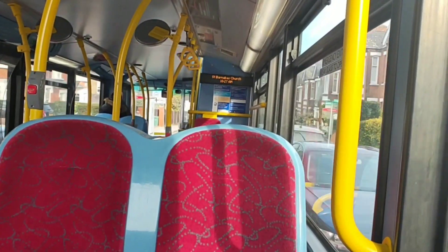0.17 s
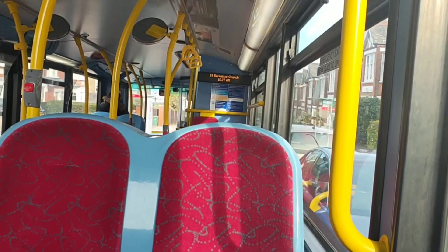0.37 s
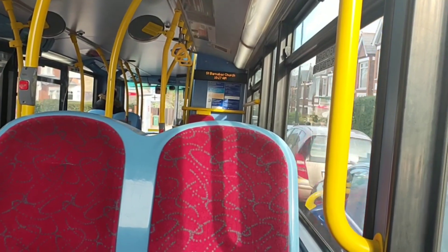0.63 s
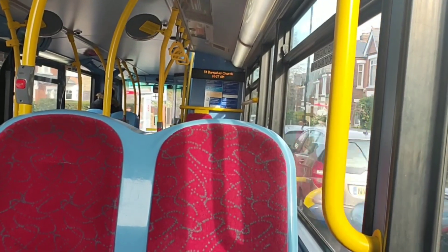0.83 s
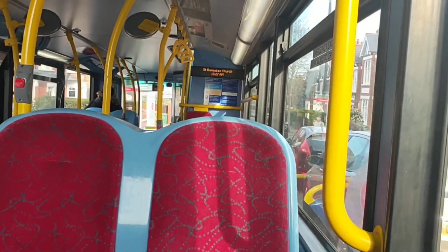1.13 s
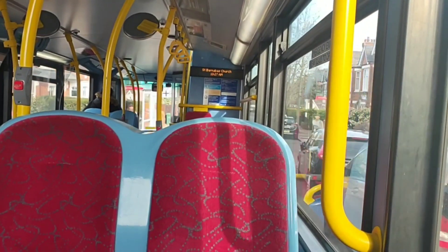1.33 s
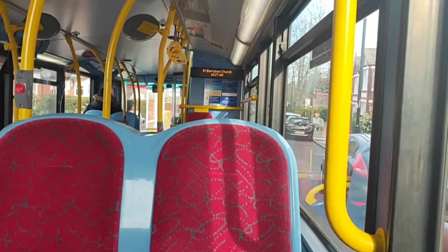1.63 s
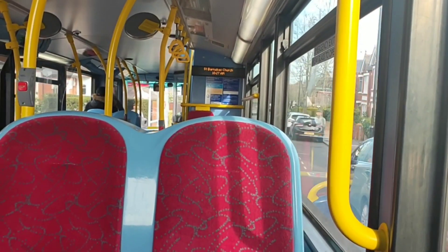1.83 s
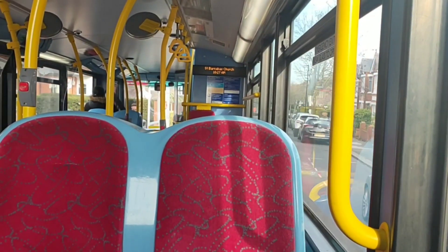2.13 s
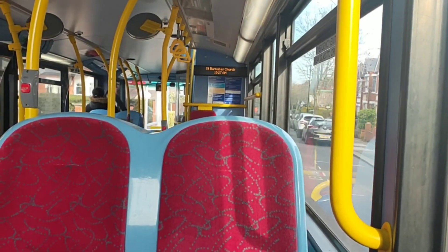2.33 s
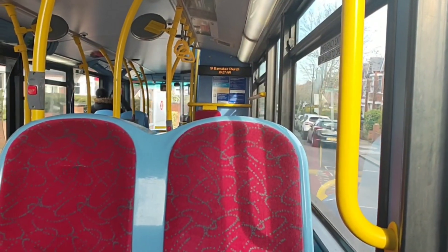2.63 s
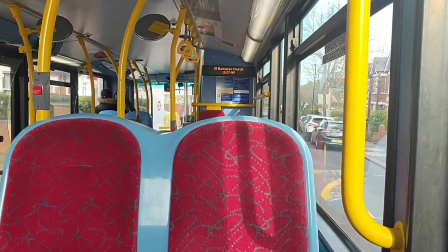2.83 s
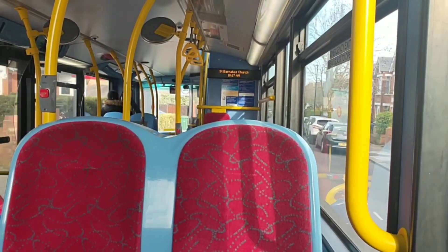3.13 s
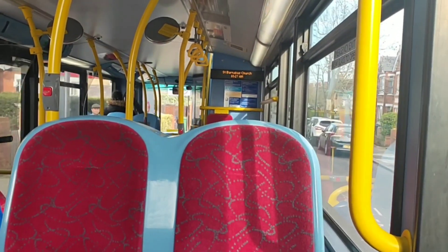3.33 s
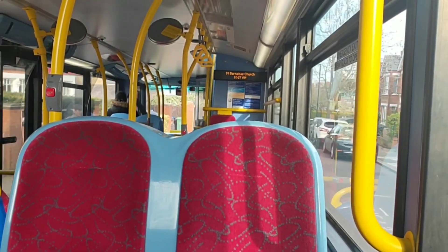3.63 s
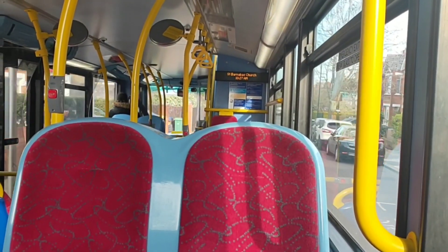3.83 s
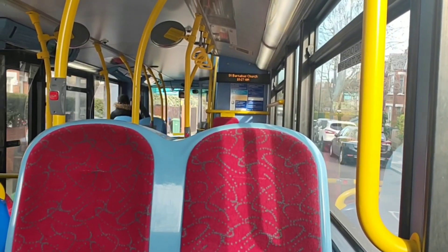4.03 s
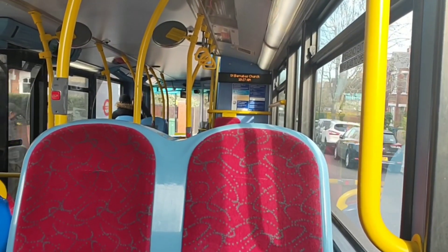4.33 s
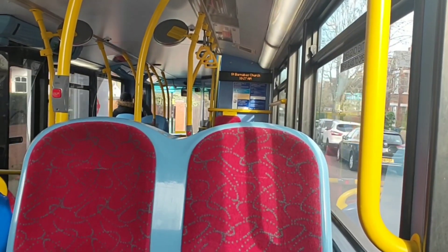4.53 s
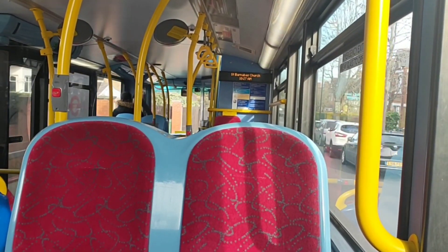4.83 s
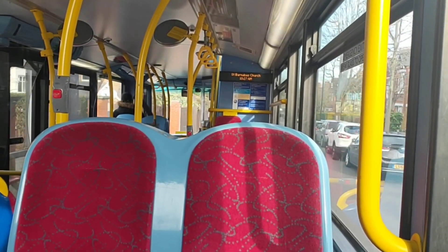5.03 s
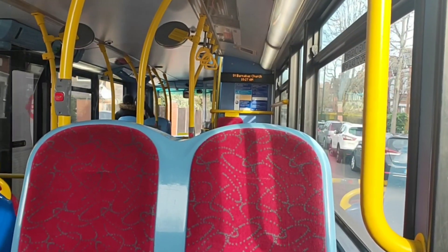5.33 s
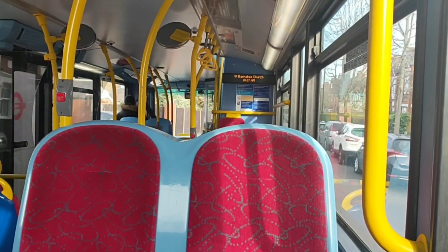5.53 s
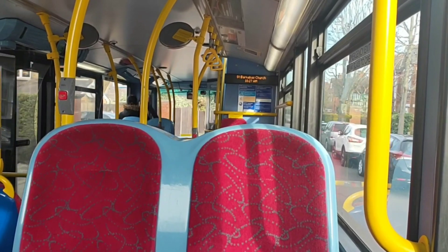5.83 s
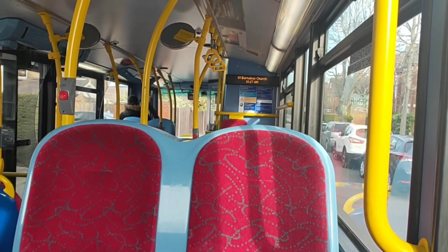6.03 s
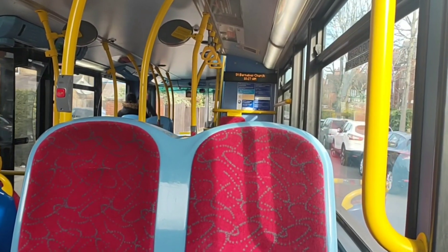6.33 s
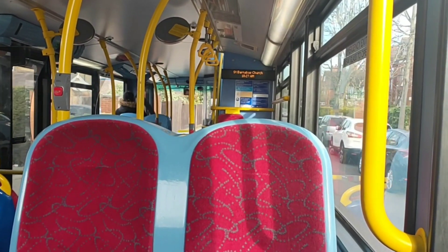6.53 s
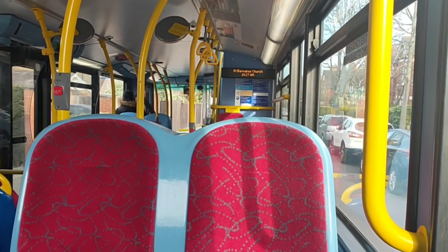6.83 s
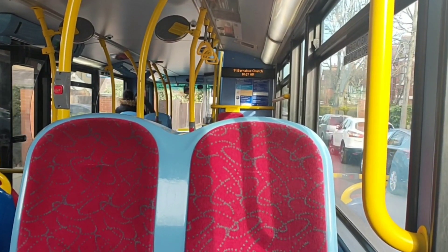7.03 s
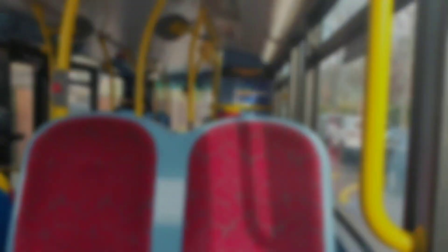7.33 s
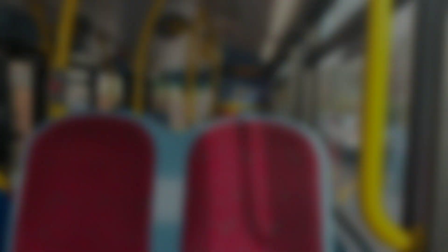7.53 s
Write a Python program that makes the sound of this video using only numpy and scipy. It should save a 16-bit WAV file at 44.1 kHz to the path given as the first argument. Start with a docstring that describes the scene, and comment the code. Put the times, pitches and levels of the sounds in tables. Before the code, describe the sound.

Inside a bus near the rear, in stereo, the sound is dominated by deep diesel rumble and low body shake, under duller road noise and faint hiss. From 0 to 1 s a loose strip taps and buzzes, light panels clatter on the left, thin high squeaks appear and a low shaft hum falls. Engine pitch steps down until about 3 s, with a gear whine sliding down from 0.4 to 2.2 s. Rattles bunch at 1.4 s and from 1.85 to 3.4 s, with duller knocks strongest near 2.7 s; the firing boom swells around 2.5 and 3.8 s. Another clatter comes at 4.3 s. Wavering brake squeaks sound from 3.7 to 5.4 s, then at 6.5 and 7.3 s. Small metal ticks come at 5.8 and 6.3 s, and a short panel scuff at 6.9 s. Finally the engine nears idle, road noise drops away, and light rattles end it.

```python
"""Inside a slowing bus, near the rear: at first a loose strip taps, thin high squeaks sound and a shaft hum falls.
A six-cylinder diesel, summed from crank orders, steps down toward idle; its firing boom swells and gears whine down.
Panels, struck resonant noise, rattle and knock on the left, most densely in the first half; road noise is
banded noise that throbs with the firing, and the body bounces at a low pitch. Later the brakes squeak as
wavering lines, small metal ticks, something scuffs a panel, and the road noise falls away."""
import sys
import numpy as np
from scipy import signal
from scipy.fft import rfft, irfft
from scipy.io import wavfile
from scipy.ndimage import uniform_filter1d

SR = 44100
rng = np.random.default_rng(int(sys.argv[2]) if len(sys.argv) > 2 else 0)


def generate_wav(signal):
    """Clip the signal to [-1, 1] and save it as 16-bit WAV at the path in sys.argv[1]."""
    frames = np.transpose(np.atleast_2d(signal))
    scaled = np.clip(frames, -1, 1) * 32767
    pcm = np.round(scaled).astype(np.int16)
    wavfile.write(sys.argv[1], SR, pcm)


def makeup_ratio(level_db):
    """Linear amplitude ratio for a level in decibels (20 dB per factor of ten)."""
    decades = np.asarray(level_db, float) / 20
    return 10 ** decades


N = 338688
T = np.arange(N) / SR
HZ = np.maximum(np.fft.rfftfreq(N, 1 / SR), 1)


def curves(table):
    """Columns of a table joined over time."""
    s, *columns = np.transpose(table)
    return [np.interp(T, s, c) for c in columns]


def at(table, hz):
    """Value of a (frequency [Hz], value) table on a log frequency axis."""
    f, v = np.transpose(table)
    return np.interp(np.log(hz), np.log(f), v)


def unit(x):
    """Scaled to rms 1."""
    return x / np.sqrt(np.mean(x ** 2))


def walk(rate_hz):
    """Random levels held 1 / rate_hz and slewed twice; spread about 1.7."""
    k = int(SR / rate_hz)
    held = np.repeat(rng.standard_normal(N // k + 1), k)
    return 2.31 * uniform_filter1d(uniform_filter1d(held, k), k)[:N]


def pan(lean_db):
    """Left and right gains as a column; lean_db is left minus right."""
    return makeup_ratio(np.array([lean_db / 2, -lean_db / 2]))[:, None]


def resonant(peaks, size=N):
    """Two unrelated noises through a set of resonances."""
    hz = np.fft.rfftfreq(size, 1 / SR)
    power = sum(makeup_ratio(2 * db) / (1 + ((hz - f) / (w / 2)) ** 2) ** 2 for f, w, db in peaks)
    return unit(irfft(rfft(rng.standard_normal((2, size))) * np.sqrt(power), size))


def struck(start_s, rise_s, t60_s, hold_s=0.):
    """Envelope that rises at start_s, holds and dies away."""
    t = T - start_s
    decay = np.exp(-np.log(1000) * np.maximum(t - rise_s - hold_s, 0) / t60_s)
    return np.clip(t / max(rise_s, 1e-4), 0, 1) * decay


def tone(table, waver, lean_db, rough_db, flutter_hz, fade_s):
    """Gain and phase of a thin line that wavers in pitch and level, fading in and out at its ends."""
    hz, db = curves(table)
    gate = np.clip(np.minimum(T - table[0][0], table[-1][0] - T) / fade_s, 0, 1)
    phase = 2 * np.pi * np.cumsum(hz * (1 + waver * walk(1200))) / SR
    gain = np.sqrt(2) * gate * makeup_ratio(db + rough_db * walk(flutter_hz)) * pan(lean_db)
    return gain, phase


# crank speed, stepping down through two gear changes toward idle: (time [s], crank rate [Hz])
CRANK_HZ = [(0, 19.9), (.5, 18.22), (.9, 16.6), (1.1, 16.4), (1.5, 16.51), (1.7, 16.2), (2.1, 14.6),
            (2.5, 12.96), (2.9, 11.82), (3.1, 11.58), (3.7, 11.67), (4.3, 11.47), (4.55, 11.24),
            (4.8, 10.75), (5.05, 10.84), (5.55, 10.81), (5.8, 10.47), (6.3, 10.26), (6.55, 10.24),
            (6.8, 10.53), (7.05, 10.55), (7.68, 10.93)]


def crank_angle():
    """Crank angle in radians, the running sum of the crank rate."""
    return 2 * np.pi * np.cumsum(curves(CRANK_HZ)[0]) / SR


# firing boom, crank order 3: (time [s], level [dB])
BOOM_DB = [(.1, -47), (.7, -39), (1.1, -27.5), (2.1, -22.5), (2.55, -13), (2.95, -20.5), (3.12, -18.5),
           (3.3, -20.5), (3.8, -14.5), (4.1, -18), (4.3, -22), (4.6, -35.5), (4.85, -25), (5.05, -54),
           (5.3, -29), (5.55, -29), (5.9, -20.5), (6.55, -22), (7.05, -29.5), (7.3, -45), (7.55, -30)]
# cabin drone, common to orders 4 and up: (time [s], level [dB])
DRONE_DB = [(.1, -27), (1.9, -30), (2.6, -33.5), (3.5, -33), (4.5, -33.5), (6.3, -36.5), (7.599, -45)]
# engine load, lift of orders 9 and 18 (other firing orders get 0.45 of it): (time [s], level [dB])
LOAD_DB = [(0, -5), (.6, 0), (2.0, -3), (2.899, 4), (3.55, -12.5), (4.0, 0.5), (4.599, -0.5), (5.1, 1),
           (5.7, 4), (6.1, 6), (6.55, 10.5), (6.751, 1.5)]
# crank orders 4, 5, 6 .. 45; firing, valve gear, pumps and belts each feed their own: (relative level [dB])
CRANK_ORDER_DB = [-24, -12, 6, -6, 0, 6.5, -2, -11, 6, -3, 1, 0, 5, -5, 3, -5, 4, -3, 0, -3, 4.5, -8, -5, 0,
                  -3, -4, 0, -4, 2, -5, 0, -6, 10, -9, 5, 2, -2, 1, -2, 0, -4, -4]
# how floor and cabin pass the orders: (frequency [Hz], gain [dB])
CABIN_GAIN_DB = [(20, -9), (38, 26), (60, -15), (95, -15.5), (130, -22), (153, -14.5), (167, -22),
                 (185, -13.5), (208, -23.5), (232, -4.5), (252, -13.5), (275, -26.5), (312, -16.5),
                 (350, -26), (400, -34.5), (460, -28.5), (520, -36), (620, -42), (720, -39)]
# stereo lean of engine and road noise: (frequency [Hz], left minus right [dB])
LEAN_DB = [(30, 5.5), (110, 3.5), (200, 7.5), (370, 5.5), (670, 1.5), (1220, 2.5), (2230, 4), (4080, 17),
           (7460, -9), (13600, 20)]


def engine(turn):
    """Crank orders as slightly wavering tones; each third is a firing order and follows the load."""
    boom_db, drone_db, load_db = (curves(table)[0] for table in (BOOM_DB, DRONE_DB, LOAD_DB))
    crank_hz = curves(CRANK_HZ)[0]
    slow = slice(0, N, 64)
    out = np.sqrt(2) * makeup_ratio(boom_db + .5 * walk(9.2)) * np.sin(3 * turn) * pan(4.7)
    for k, order_db in enumerate(CRANK_ORDER_DB, 4):
        hz = k * crank_hz[slow]
        load_share = (k % 3 == 0) * (1 if k in (9, 18) else .45)
        db = drone_db[slow] + load_share * load_db[slow] + order_db + at(CABIN_GAIN_DB, hz)
        level_waver = makeup_ratio((.5 + .03 * k) * walk(2.5))
        gain = np.sqrt(2) * np.interp(T, T[slow], makeup_ratio(db)) * level_waver
        side = pan(at(LEAN_DB, hz.mean()) + 0.45 * rng.standard_normal())
        # the left side lags, more so up the orders
        lag_rad = np.array([[0.013 * k + 0.012 * k * rng.standard_normal()], [0]])
        phase = k * turn + 2 * np.pi * rng.random() + 0.06 * walk(3.7) - lag_rad
        out += gain * side * np.sin(phase)
    return out


# light panels: (time [s], relative level [dB], bright edge re panel [dB], strongest ring [Hz], t60 [s])
RATTLE_HITS = [(0.024, -43, -8, 4930, 0.08), (0.0586, -42, -16, 3300, 0.2),
               (0.1144, -38.5, -25, 2580, 0.14), (.164, -46, -12, 4500, .06), (0.2654, -42, -22, 2600, .25),
               (0.689, -40, -19.5, 3570, 0.4), (0.7439, -40, -16.5, 4900, 0.61), (.785, -45, -15, 4900, .5),
               (0.8229, -40.5, -17, 3700, 0.5), (1.4016, -45, -5, 2780, 0.67),
               (1.4706, -48, -9, 2390, 0.63), (1.8521, -35, -10.5, 3410, 0.34),
               (1.921, -39.5, -13, 3300, 0.37), (2.0687, -42, -10.5, 3200, 0.23),
               (2.138, -43, -16, 3170, 0.27), (2.207, -48, -18, 3300, .25), (2.292, -42, -17, 3230, 0.23),
               (2.3634, -45, -19.5, 3300, 0.3), (2.443, -48, -20, 3300, .3),
               (2.519, -48.5, -24, 3370, 0.32), (2.6714, -47, -8.5, 3100, 0.4), (2.706, -49, -6, 2400, 0.4),
               (2.8683, -38, -12.5, 3230, 0.17), (2.9405, -43, -3, 2200, 0.17),
               (2.981, -47.5, -1, 3180, 0.43), (3.0835, -39, -10, 3200, .08),
               (3.1486, -49, -14.5, 2350, 0.5), (3.3719, -50.5, -5.5, 3180, 0.58),
               (4.3005, -36.5, -11.5, 2830, 0.12), (4.395, -40, -10, 3100, 0.18),
               (7.58, -47, -16, 3300, 0.3), (7.645, -51, -23, 3410, .3)]
# light panel resonances: (frequency [Hz], width [Hz], level [dB])
PANEL_RINGS = [(2170, 2900, 3.5), (3400, 1020, 5.5), (4690, 1900, 1.5)]
# bright edge resonances: (frequency [Hz], width [Hz], level [dB])
EDGE_RINGS = [(6800, 2800, 5.5), (11900, 3500, -10)]


def rattles():
    """Jolted light panels: a broad clatter with its own strongest ring and a bright edge, both decaying."""
    size = 16384
    out = np.zeros((2, N + size))
    t = T[:size]
    for s, db, edge_db, ring_hz, t60_s in RATTLE_HITS:
        rise = np.minimum(t / (.0005 + .02 * t60_s ** 2), 1)
        ring = 0.55 * np.exp(-np.log(1000) * t / max(t60_s, .02))
        snap = 0.27 * np.exp(-t / 0.005)
        panel = resonant(PANEL_RINGS + [(ring_hz, 450, 7.0)], size) * pan(10.3)
        edge = resonant(EDGE_RINGS, size) * pan(2.7)
        start = int(s * SR)
        out[:, start:start + size] += makeup_ratio(db) * rise * (ring + snap) * (panel + makeup_ratio(edge_db) * edge)
    return makeup_ratio(0.85 * walk(600)) * out[:, :N]


# heavier panels: (time [s], peak level [dB], strongest ring [Hz])
KNOCK_HITS = [(.0584, -48, 744), (1.4018, -51.5, 1220), (1.4675, -49.5, 1260), (1.8513, -61, 1290),
              (2.292, -54, 990), (2.514, -47.5, 990), (2.564, -44.5, 990), (2.659, -41, 1230),
              (2.68, -39.5, 725), (2.725, -46, 1370), (2.775, -57, 736), (2.8698, -52, 1410),
              (2.979, -54, 1006), (3.121, -49, 1280), (3.15, -47, 1240), (4.08, -49.5, 970)]
# heavier panel resonances: (frequency [Hz], width [Hz], level [dB])
KNOCK_RINGS = [(716, 70, -2), (1050, 140, -1), (1220, 170, 0), (1420, 200, -5)]


def knocks():
    """Heavier panels knock duller: one decaying blow, each with its own strongest ring."""
    size = 16384
    out = np.zeros((2, N + size))
    blow = struck(0, rise_s=0.0055, t60_s=0.39)[:size] * pan(11.0)
    for s, db, ring_hz in KNOCK_HITS:
        start = int(s * SR)
        out[:, start:start + size] += makeup_ratio(db) * blow * resonant(KNOCK_RINGS + [(ring_hz, 110, 3.0)], size)
    return makeup_ratio(0.85 * walk(600)) * out[:, :N]


# loose strip taps: (time [s], relative level [dB])
STRIP_TAPS = [(0.0887, -45), (0.2678, -42), (0.3317, -48), (0.4764, -43), (0.6071, -46), (0.6699, -42),
              (0.738, -39), (0.8316, -42), (0.97, -45), (1.0605, -48)]
# strip resonances: (frequency [Hz], width [Hz], level [dB])
STRIP_RINGS = [(1072, 180, 6), (1200, 100, -7)]


def trim():
    """A loose strip taps and buzzes early on: struck resonant noise with a fast random level."""
    taps = sum(makeup_ratio(db) * struck(s, rise_s=0.01, t60_s=0.34) for s, db in STRIP_TAPS)
    return makeup_ratio(-3.0 + 1.4 * walk(200)) * taps * resonant(STRIP_RINGS) * pan(3.9)


# scuffed panel resonances: (frequency [Hz], width [Hz], level [dB])
SCUFF_RINGS = [(940, 990, -2.5), (2180, 490, -0.5), (2980, 610, -6), (6360, 1760, -6.5), (7200, 500, -9.5),
               (11500, 5000, -24.5)]


def scuff():
    """Something slides against a panel late on: resonant noise that rises, holds and dies away."""
    slide = struck(6.878, rise_s=0.0093, t60_s=0.63, hold_s=0.033)
    return makeup_ratio(-46.5) * slide * resonant(SCUFF_RINGS) * pan(7.0)


# brake squeaks: (start [s], length [s], first pitch [Hz], last pitch [Hz], peak level [dB])
BRAKE_SQUEAKS = [(0, 0.22, 10150, 10190, -68), (.22, .31, 7900, 7960, -64), (4.61, .14, 5120, 5060, -71),
                 (1.85, 0.28, 6830, 6590, -64), (3.69, 0.13, 7400, 7600, -62.5),
                 (3.957, 0.34, 6600, 6850, -62.5), (4.23, 0.37, 6250, 6170, -60),
                 (4.537, .16, 6690, 6650, -62.5), (5.16, 0.26, 6540, 6860, -61.5),
                 (6.52, .07, 6350, 6340, -64), (6.57, 0.33, 6350, 6300, -61), (7.33, 0.27, 6365, 6368, -62)]
# squeak level at both ends: (pitch [Hz], level re peak [dB])
SQUEAK_END_DB = [(6370, -20.5), (6600, -10.5), (7500, -26)]
# full-level span of a squeak: (from [share of length], to [share of length])
SQUEAK_FULL_SPAN = (.25, .7)
# faint line between the last two squeaks: (time [s], pitch [Hz], level [dB])
PAD_DRAG_LINE = [(6.8, 6313, -69), (7.05, 6312, -70), (7.2, 6330, -76), (7.38, 6360, -71)]
# fast pitch waver: (pitch [Hz], waver [share of pitch])
HOARSE_WAVER = [(5100, .002), (6370, .0015), (6650, .007), (7500, .008), (7900, .008), (10150, .012)]
# stereo lean of squeaks: (pitch [Hz], left minus right [dB])
SQUEAK_LEAN_DB = [(6220, -2.5), (6700, -6), (7900, -6), (10150, -3)]


def squeak_line(start_s, length_s, first_hz, last_hz, peak_db):
    """One pad slip as (time [s], pitch [Hz], level [dB]): a pitch glide that swells and fades."""
    end_db = at(SQUEAK_END_DB, first_hz)
    full, fade = SQUEAK_FULL_SPAN
    points = ((0, end_db), (full, 0), (fade, 0), (1, end_db))
    return [(start_s + share * length_s, first_hz + share * (last_hz - first_hz), peak_db + db)
            for share, db in points]


def brakes():
    """Pads slip on the discs as wavering lines; mid-pitched ones carry a faint partial a fifth above."""
    out = np.zeros((2, N))
    for table in [squeak_line(*row) for row in BRAKE_SQUEAKS] + [PAD_DRAG_LINE]:
        hz = table[1][1]
        waver = at(HOARSE_WAVER, hz)
        gain, phase = tone(table, waver, at(SQUEAK_LEAN_DB, hz), rough_db=1.2 + 150 * waver,
                           flutter_hz=110, fade_s=0.015)
        fifth = makeup_ratio(-17) * (6500 < hz < 7000)
        out += gain * (np.sin(phase) + fifth * np.sin(phase * 3 / 2 + .6 * walk(400)))
    return out


# falling shaft hum, falling gear whine, two short thin rings; each: (time [s], pitch [Hz], level [dB])
HUM_WHINE_RING_LINES = [
    [(0, 40.6, -25), (.42, 38.4, -26.5), (.55, 36.4, -26.5), (.75, 36.9, -27), (.95, 36.3, -36)],
    [(.4, 572, -58), (.65, 530, -50), (1.0, 482, -56), (1.25, 445, -49), (1.55, 400, -59), (1.85, 372, -46),
     (2.2, 340, -58)],
    [(.9, 3310, -72), (1.14, 3300, -69), (1.24, 3300, -74)],
    [(6.2, 1000, -61), (6.33, 995, -56), (6.48, 990, -64)],
]


def gears():
    """Shaft and tooth-mesh tones of the driveline, and two short thin rings, as slightly wavering sines."""
    out = np.zeros((2, N))
    for table in HUM_WHINE_RING_LINES:
        gain, phase = tone(table, waver=.004, lean_db=4.5, rough_db=1.7, flutter_hz=45, fade_s=.06)
        out += gain * np.sin(phase)
    return out


# small metal part: (time [s], relative level [dB])
TICK_HITS = [(5.8222, -58), (6.2402, -55.5), (6.3347, -49), (6.3694, -49)]


def ticks():
    """A small metal part ticks: short bursts of noise through one bright resonance."""
    hits = sum(makeup_ratio(db - 2) * struck(s, rise_s=.001, t60_s=0.06) for s, db in TICK_HITS)
    return hits * resonant([(5950, 700, 0)])


# body shake: (time [s], level [dB])
BOUNCE_DB = [(0.05, -10), (0.2, -20), (1.22, -20.5), (1.34, -37), (1.64, -13.5), (2.9, -47.5), (3.26, -14),
             (3.49, -33), (3.58, -20.5), (3.72, -34), (3.98, -26), (4.94, -42), (5.92, -33), (7.23, -50),
             (7.59, -29), (7.68, -48)]


def bounce():
    """The body shakes on its tyres and springs: a low sine of wavering pitch."""
    hz = 13.9 * (1 + 0.016 * walk(12))
    shake = np.sin(2 * np.pi * np.cumsum(hz) / SR)
    return np.sqrt(2) * makeup_ratio(curves(BOUNCE_DB)[0]) * shake * pan(4.6)


# noise bands above the rumble:
# (time [s], tyre roar level [dB], panel buzz level [dB], diesel clatter level [dB], treble hiss level [dB])
RIDE_DB = [(0.1, -52.5, -51, -52.5, -57), (0.52, -51, -51, -57, -60.5), (1.75, -51.5, -54, -59, -59.5),
           (2.8, -51, -54.5, -55, -62), (3.48, -52, -57, -60.5, -62), (4.64, -55, -56, -59.5, -60),
           (4.74, -52, -54, -56.5, -60.5), (5.1, -52.5, -53, -54, -60.5), (5.55, -52.5, -56, -60.5, -64),
           (5.88, -52, -57, -55.5, -63), (5.96, -52, -52.5, -53, -56.5), (6.64, -54, -54, -55, -57),
           (6.8, -56.5, -58.5, -59, -57.5), (7.68, -65, -65, -66.5, -69.5)]
# edges between rumble, roar, buzz, clatter and hiss: (frequency [Hz])
BAND_EDGES_HZ = [430, 900, 1800, 3500]
# noise spectrum: (frequency [Hz], relative level [dB])
RIDE_COLOUR_DB = [(9, -9.5), (17, -14), (25, -0.5), (45, -18), (90, -15.5), (150, -27.5), (240, -27.5),
                  (350, -35.5), (500, -37.5), (830, -43), (1190, -42), (1990, -51), (2520, -52.5),
                  (4340, -63.5), (6240, -61.5), (7900, -71), (13100, -85), (14200, -90)]
# left-right likeness: (frequency [Hz], likeness [0-1])
STEREO_LIKENESS = [(60, 1), (130, 1), (280, 0.95), (610, 0.28), (1330, 0.06), (2890, 0), (6280, 0),
                   (13600, 0)]
# panels that ring all the time: (frequency [Hz], width [Hz], lift [dB])
BODY_RING_LIFTS = [(1030, 15, 2), (1610, 33, 6.5), (3340, 370, 3), (4930, 740, 5.5), (7100, 800, 4.5)]


def ride(turn):
    """Road and engine noise through the body; the top throbs with firing and valve gear under load."""
    drone_db, load_db = curves(DRONE_DB)[0], curves(LOAD_DB)[0]
    a, b = rfft(rng.standard_normal((2, N)))
    like = np.where(HZ < 50, 1, np.clip(at(STEREO_LIKENESS, HZ), 0, 1))
    both = np.array([a, like * a + np.sqrt(1 - like ** 2) * b])
    both = both * makeup_ratio(at(RIDE_COLOUR_DB, HZ)) * pan(at(LEAN_DB, HZ))[:, 0]
    both = both * makeup_ratio(sum(db / (1 + ((HZ - f) / (w / 2)) ** 2) for f, w, db in BODY_RING_LIFTS))

    # half-octave bands, each with its own slow random level
    groups = np.zeros((len(BAND_EDGES_HZ) + 1, 2, N))
    for hz in 9 * 2 ** np.arange(0, 10.6, .5):
        share = np.clip(1 - np.abs(2 * np.log2(HZ / hz)), 0, 1)
        groups[np.searchsorted(BAND_EDGES_HZ, hz)] += irfft(both * share, N) * makeup_ratio(1.1 * walk(7))

    # three firings a turn, each of its own size; the valve gear chatters four times as fast
    pulsing = np.clip(0.058 + 0.022 * load_db, 0, .9)
    firing = 3 * turn / (2 * np.pi)
    size = makeup_ratio(4.0 * rng.standard_normal(int(firing[-1]) + 1))[firing.astype(int)]
    burst = 2.5 * size * np.exp(-(firing % 1) / .3)
    chatter = .45 * np.cos(4 * 2 * np.pi * firing)
    throb = 1 + pulsing * (burst + chatter - .8)
    groups[3:] *= throb
    groups[2] *= np.sqrt(throb)

    # the low rumble dies away with the drone as the bus slows
    rumble_db = uniform_filter1d(drone_db, SR) + 6.5
    return sum(unit(g) * makeup_ratio(db) for g, db in zip(groups, [rumble_db, *curves(RIDE_DB)]))


def scene():
    """All sources together; engine and ride share one crank angle."""
    turn = crank_angle()
    panels = rattles() + knocks() + trim() + scuff()
    return engine(turn) + panels + brakes() + gears() + ticks() + bounce() + ride(turn)


def band_limit(x):
    """A steep low-pass at the top of the band."""
    return signal.sosfilt(signal.butter(12, 14230, fs=SR, output="sos"), x)


def record(dry):
    """The finished mix, ready to write."""
    return band_limit(dry)


dry = scene()
out = record(dry)
generate_wav(out)
```